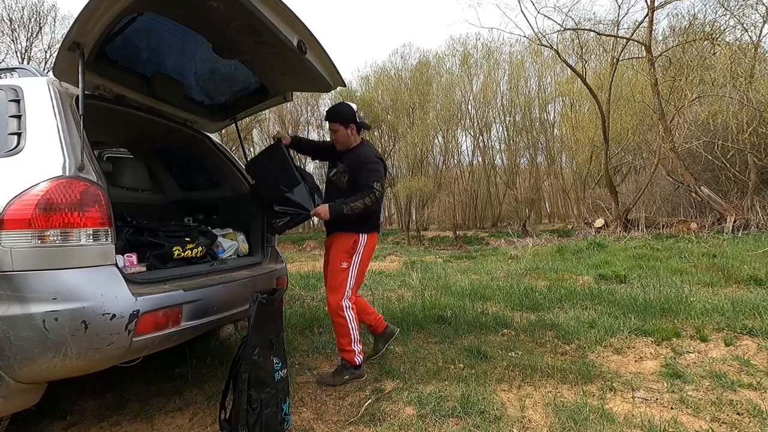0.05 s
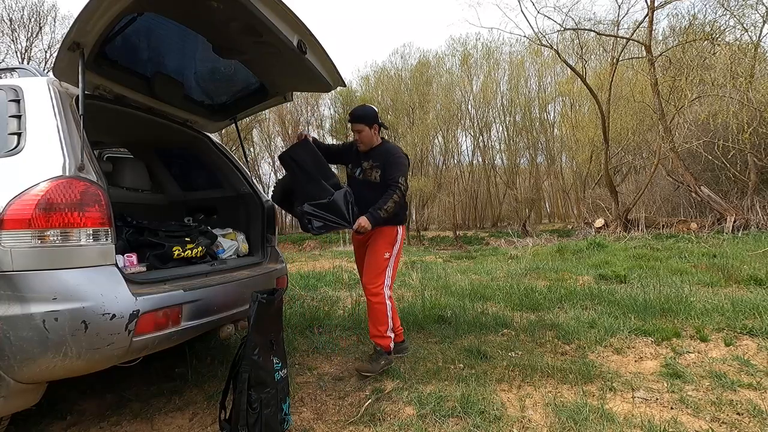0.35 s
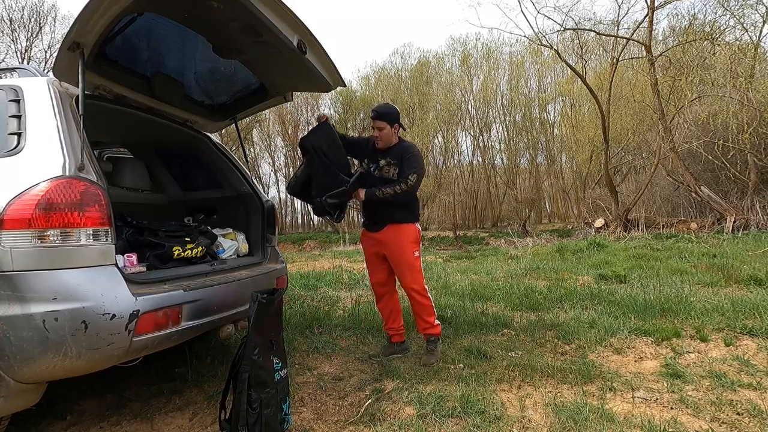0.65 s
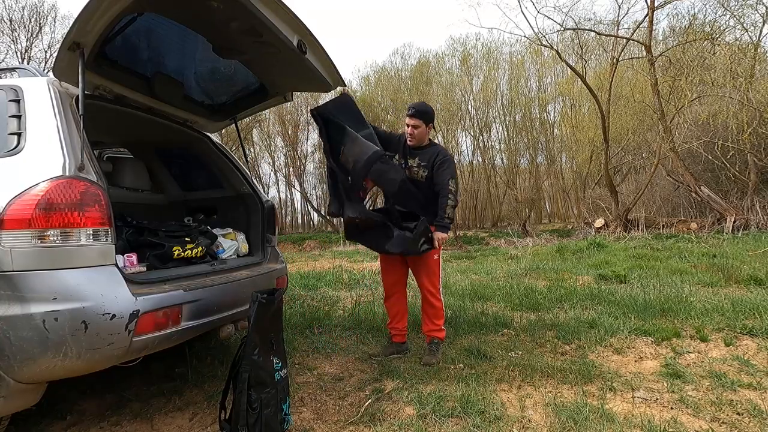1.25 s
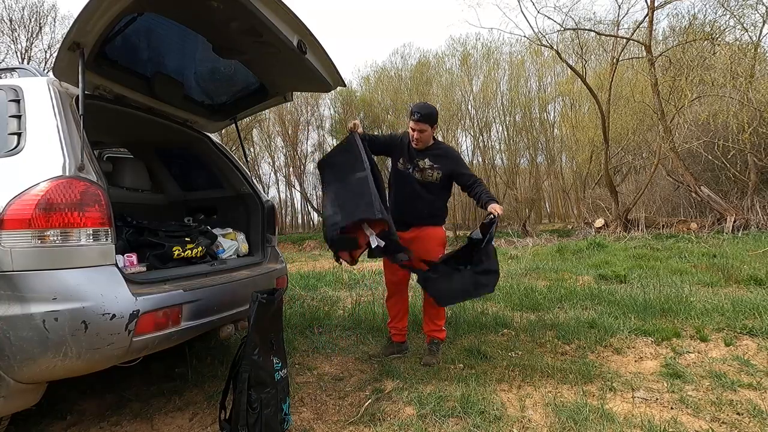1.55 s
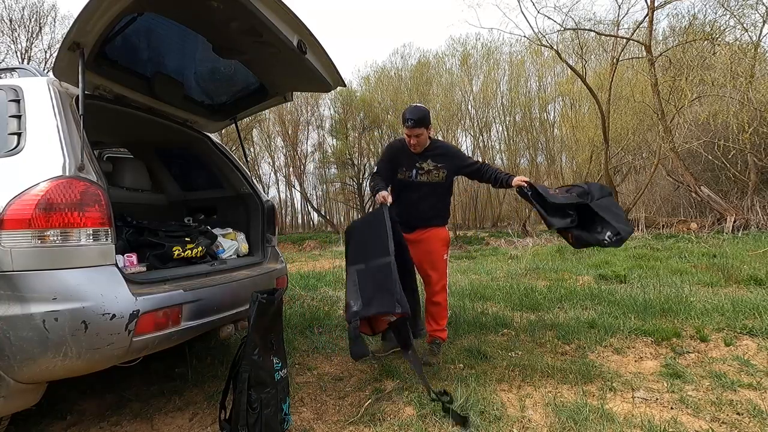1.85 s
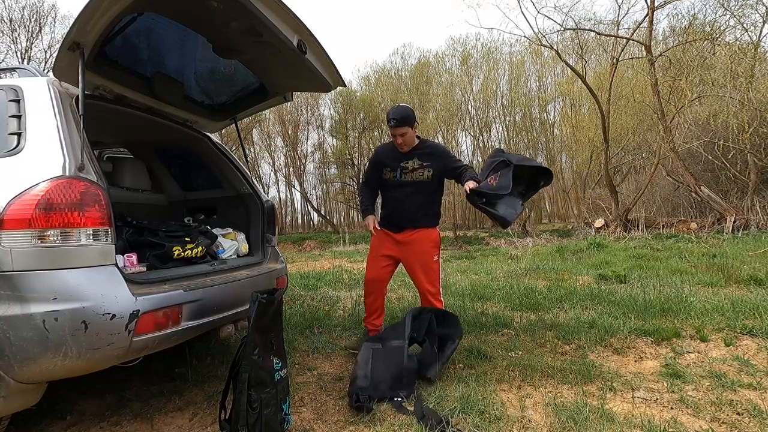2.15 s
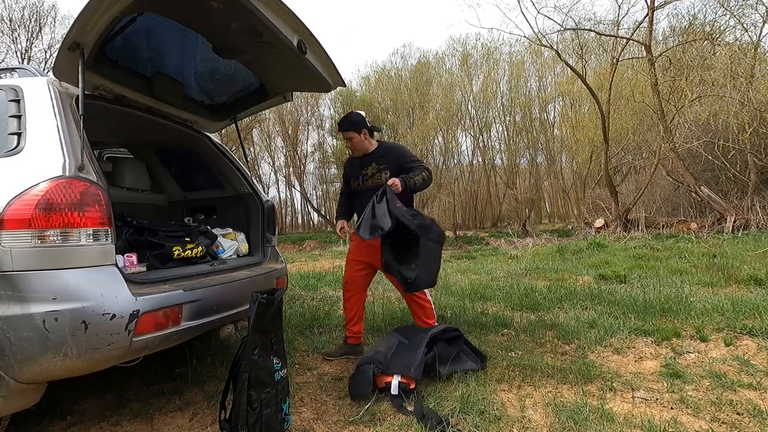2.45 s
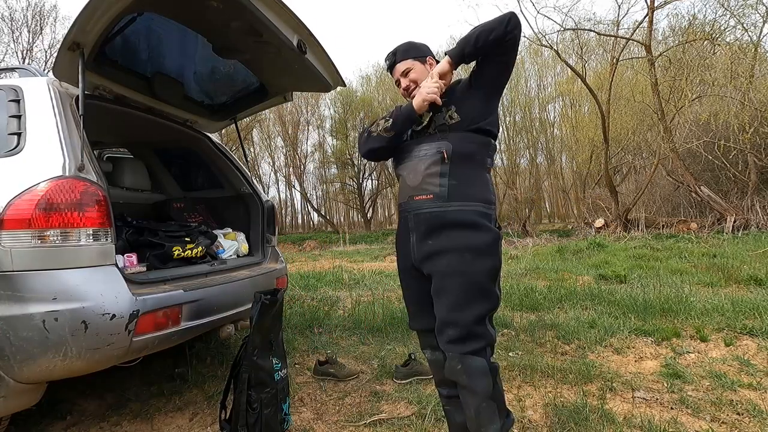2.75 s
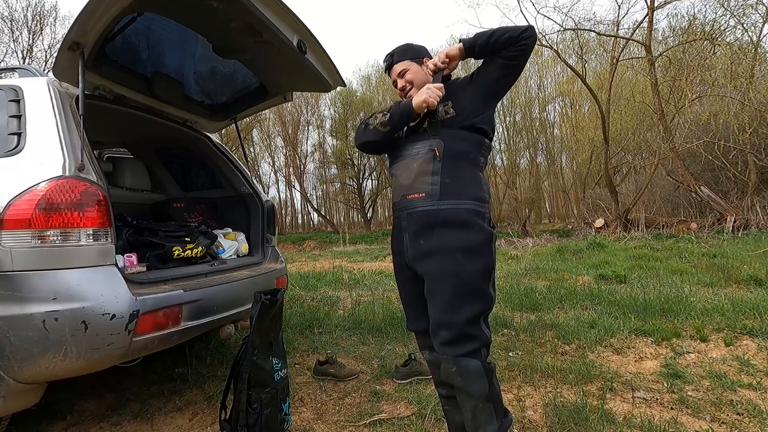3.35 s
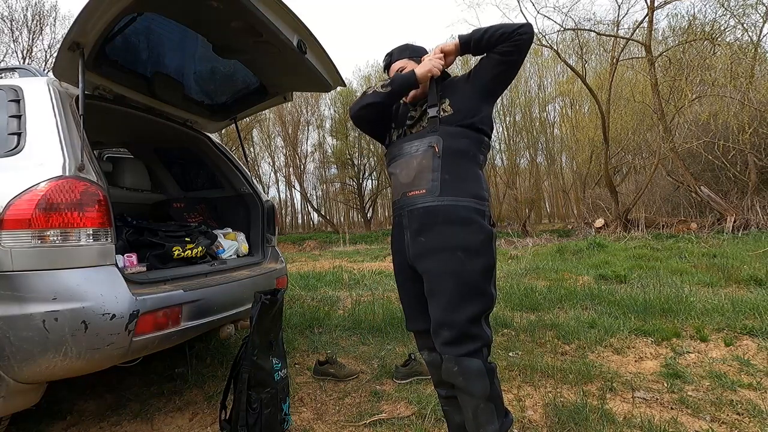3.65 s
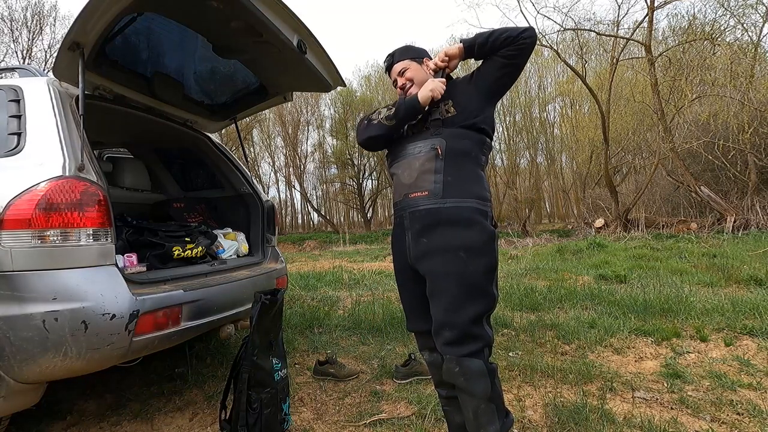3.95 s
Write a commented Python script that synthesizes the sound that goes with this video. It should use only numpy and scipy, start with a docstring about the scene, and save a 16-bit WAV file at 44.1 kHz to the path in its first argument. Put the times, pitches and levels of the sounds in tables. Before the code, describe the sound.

Fabric rustles and snaps as a diving suit is pulled from a bag, then lands on grass with a hollow thud. A click and a short fastener rasp follow, while woodland birds twitter and wind rumbles on the microphone.

```python
"""A diving suit is pulled out of a fabric bag, shaken loose and dropped on the grass by a parked car.
Its sliding cloth hisses and crackles, its folds snap tight, and it lands with a hollow thud.
After a sharp click the handling is quieter, and a fastener on the suit rasps open hook by hook.
Small birds whistle and twitter in the trees, and gusts of wind rumble on the microphone."""
import sys
import numpy as np
from scipy import signal
from scipy.fft import rfft, irfft, next_fast_len
from scipy.io import wavfile
from scipy.ndimage import uniform_filter1d, map_coordinates

SR = 44100
rng = np.random.default_rng(int(sys.argv[2]) if len(sys.argv) > 2 else 0)


def generate_wav(sig):
    """Save sig (samples, or channels by samples) to the path in sys.argv[1] as 16-bit PCM at SR."""
    pcm = np.round(np.clip(np.atleast_2d(sig).T, -1, 1) * 32767).astype(np.int16)
    wavfile.write(sys.argv[1], SR, pcm)


N = 176400
T = np.arange(N) / SR

# Tone colours of the quiet woods, the wind's low rumble and its gusts: f/Hz, gain/dB
HUSH_COLOUR = [(250, -1), (650, -16), (1400, -14.5), (2200, -18), (7300, -24), (8800, -35), (15000, -48)]
RUMBLE_COLOUR = [(10, -10.5), (30, 2.5), (60, -0.5), (120, -13.5), (300, -42.5), (2000, -100)]
GUST_COLOUR = [(30, -30), (75, 6), (140, -1.5), (200, -10), (400, -27.5), (2000, -85)]
# Strength of the wind: t/s, level/dB
WIND_LEVELS = [(0, -41.5), (.14, -34), (.44, -35), (.51, -53), (.68, -39), (.88, -56.5), (1.12, -36),
               (1.25, -46), (1.52, -32.5), (1.74, -30), (1.79, -38), (2.02, -48.5), (2.38, -41),
               (2.48, -57), (2.62, -45.5), (2.66, -32.5), (2.78, -37), (2.82, -24), (2.96, -27), (3.0, -22),
               (3.12, -23), (3.21, -33), (3.45, -37), (3.51, -31), (3.66, -39.5), (3.82, -24.5),
               (3.9, -20.5), (3.96, -38)]

# Bird whistles: t/s, length/s, start f/Hz, middle f/Hz, end f/Hz, relative level/dB
BIRD_WHISTLES = [(0.216, 0.085, 5760, 4800, 4550, -54.5), (0.779, 0.2, 7060, 6480, 6250, -57.5),
                 (1.029, 0.2, 7000, 6260, 5670, -55), (1.873, .055, 3970, 3850, 3700, -62),
                 (2.025, 0.073, 6640, 6350, 6340, -56.5), (2.24, 0.2, 7030, 6120, 5850, -61)]
# Twitters farther off: t/s, length/s, start f/Hz, end f/Hz, relative level/dB
BIRD_TWITTERS = [(0.069, 0.094, 5700, 3280, -52.5), (0.192, 0.077, 4900, 2860, -58),
                 (0.592, 0.07, 5960, 3750, -57.5), (0.879, .13, 3800, 4160, -53.5)]
# Runs of short chirps: t/s, number of chirps, relative level/dB
CHIRP_RUNS = [(2.274, 3, -54.5), (3.45, 4, -62.5)]
# Starts of a two-note song: t/s
SONG_STARTS = [2.584, 2.82, 3.073, 3.329, 3.602]
CHIRP_S, CHIRP_LOW_HZ, CHIRP_HIGH_HZ = .05, 3950, 5150
BIRD_WAVER, BIRD_BLUR_HZ = .0082, 380  # waver is a fraction of the pitch

# The click's low tail and sharp edge: level/dB, time to fade by 60 dB/s, f/Hz
CLICK_PARTS = [(-23.5, .06, 70), (-39, .0006, 0)]
# The fastener peeling open: t/s, level/dB
PEEL_LEVELS = [(3.215, -63), (3.285, -48), (3.32, -43.5), (3.355, -42.5), (3.385, -49), (3.425, -63)]
# Tone colour of its hooks: f/Hz, gain/dB
HOOK_COLOUR = [(500, -12), (1200, -13), (2600, 1), (5800, 0), (6600, -15), (12000, -26.5), (16000, -59)]
# Pitches at which its stiff flap rings: f/Hz, width/Hz, gain/dB
FLAP_RINGS = [(1100, 350, -2), (1660, 330, 0)]

# The squeak's first three harmonics: gain/dB
SQUEAK_HARMONICS = [-1, -10.5, -13]
# A footstep, then the suit landing in a heap: t/s, level/dB, hold/s
GROUND_HITS = [(.2, -42, 0.011), (2.086, -17.5, 0.02), (2.159, -26.5, 0.0027)]
# Tone colour of a thump on the ground: f/Hz, gain/dB
THUMP_COLOUR = [(30, -22), (150, 4.5), (270, -4), (500, -17.5), (3000, -64)]
# Folds snapping tight: t/s, level/dB, time to fade by 60 dB/s, centre f/Hz
FOLD_SNAPS = [(.092, -34, 0.034, 1490), (1.232, -37.5, 0.057, 3500), (1.302, -38, 0.025, 700),
              (1.337, -33, .04, 4500), (1.348, -23, 0.078, 678), (1.352, -23.5, 0.085, 1100),
              (1.529, -34.5, 0.043, 1800), (1.588, -28.5, 0.039, 1030), (1.715, -31.5, 0.08, 1670),
              (1.771, -30.5, 0.031, 1020), (1.827, -37, 0.06, 3000), (2.043, -38, 0.058, 2290),
              (2.108, -30.5, .04, 1390), (2.161, -29, 0.041, 1000), (2.188, -23.5, 0.029, 1460),
              (2.237, -34.5, 0.064, 1210), (2.514, -38, 0.033, 1300), (2.697, -47.5, 0.053, 3720)]
# Softening of the snaps' highest treble: f/Hz, gain/dB
SNAP_COLOUR = [(11500, -2), (16000, -26)]
# Fabric rubbing on fabric: t/s, body level/dB, treble level/dB
RUB_LEVELS = [(0, -50, -48.5), (.13, -40, -47), (.19, -54, -55), (.3, -67.5, -66.5), (.43, -47.5, -52),
              (.55, -57, -57), (.68, -51, -55.5), (.92, -50.5, -50.5), (1.35, -44, -48.5),
              (1.44, -50.5, -51.5), (1.55, -46.5, -51.5), (1.66, -59.5, -63.5), (1.75, -53.5, -54),
              (1.88, -59.5, -60), (2.075, -54.5, -53), (2.1, -36, -43), (2.16, -40, -44.5),
              (2.22, -50, -53.5), (2.41, -56, -59.5), (2.52, -53.5, -53.5), (2.63, -53.5, -58),
              (2.66, -70, -73)]
# The suit dragging inside the bag, and sleeves brushing the suit: t/s, length/s, level/dB
BAG_DRAGS = [(.33, 0.21, -50.5), (.72, 0.44, -49.5), (1.22, 0.23, -40)]
SLEEVE_BRUSHES = [(3.48, 0.063, -58), (3.56, 0.21, -61), (3.94, 0.16, -47.5)]
# Tone colours of the rubbing's body and treble, the drags and the brushes: f/Hz, gain/dB
BODY_COLOUR = [(60, -22.5), (300, 1.5), (1200, -1), (2800, -8.5), (4000, -19.5), (16000, -86)]
SWISH_COLOUR = [(1000, -9), (3300, -0.5), (7300, -6.5), (8500, -15), (12000, -23.5), (16000, -40.5)]
DRAG_COLOUR = [(100, -17.5), (330, 6), (450, 5), (750, -36), (1050, -7), (2000, -15), (6000, -63)]
BRUSH_COLOUR = [(600, -11.5), (1650, -7), (2200, -10), (6500, -13), (16000, -43)]


def amp(db):
    """Turn decibels into a number to multiply by."""
    return 10 ** (np.asarray(db) / 20)


def fade(t, fade_s):
    """Die away by 60 dB every fade_s seconds."""
    return amp(-60 * t / fade_s)


def unit(x):
    """Scale x to an average strength (rms) of 1."""
    return x / np.sqrt(np.mean(x ** 2) + 1e-20)


def curves(rows):
    """Join timed points with straight lines, one curve per column after the time."""
    times, *columns = np.transpose(rows)
    return [np.interp(T, times, column) for column in columns]


def wobble(per_s):
    """A smooth curve through per_s random points a second."""
    return map_coordinates(rng.standard_normal(int(N * per_s / SR) + 4), [T * per_s])


def stroke(start, length, db):
    """One smooth swell and fall."""
    return amp(db) * np.sin(np.pi * np.clip((T - start) / length, 0, 1))


def filtered(x, response):
    """Multiply each frequency in x by response(frequency)."""
    n = x.shape[-1]
    padded = next_fast_len(n + 8192)
    return irfft(rfft(x, padded) * response(np.fft.rfftfreq(padded, 1 / SR)), padded)[..., :n]


def resonance(f, hz, width_hz):
    """How something that rings at hz responds to frequency f."""
    return 1j * f * width_hz / (hz * hz - f * f + 1j * f * width_hz)


def colour(x, points):
    """Shape the bass and treble of x with a tone colour table."""
    f, db = np.transpose(points)
    return filtered(x, lambda hz: amp(np.interp(np.log(hz + 1), np.log(f), db)))


def spread(pair, side_db):
    """Make left and right from a middle and a side signal; more side sounds wider."""
    side = amp(side_db) * pair[1]
    return np.array([pair[0] + side, pair[0] - side])


def noise(points, side_db):
    """Stereo noise with a tone colour, at strength 1."""
    return unit(spread(colour(rng.standard_normal((2, N)), points), side_db))


def add(out, start, x):
    """Mix x into out, beginning at start seconds."""
    part = out[..., max(round(start * SR), 0):][..., :x.shape[-1]]
    part += x[..., :part.shape[-1]]


def crackle(times, sizes, fade_s):
    """Two channels of tiny fading noise bursts, at strength 1."""
    hits = np.bincount((times * SR).astype(int), sizes ** 2, N)[:N]
    power = signal.lfilter([1], [1, -fade(1 / SR, fade_s) ** 2], hits)
    return unit(np.sqrt(power) * rng.standard_normal((2, N)))


def glide(length, start_hz, middle_hz, end_hz, waver=BIRD_WAVER):
    """The phase and fluttering swell of a note that slides through three pitches."""
    progress = np.linspace(0, 1, int(length * SR))
    hz = np.polyval(np.polyfit([0, .5, 1], [start_hz, middle_hz, end_hz], 2), progress)
    drift, flutter = [map_coordinates(points, [progress * length * 120], mode="mirror")
                      for points in rng.standard_normal((2, 64))]
    phase = 2 * np.pi * np.cumsum(hz * (1 + waver * drift)) / SR
    swell = np.sqrt(2 * np.abs(np.sin(np.pi * progress))) * amp(3 * flutter)
    return phase, swell


def blurred(phase, width_hz):
    """Smear a note into a narrow band of noise, at strength 1."""
    a, b = filtered(rng.standard_normal((2, len(phase))), lambda f: np.exp(-(f / width_hz) ** 2))
    return unit(a * np.sin(phase) + b * np.cos(phase))


def hush():
    """The faint, steady hiss of the woods."""
    return amp(-58) * noise(HUSH_COLOUR, side_db=-6)


def far_birds(per_s=20, low_hz=3900, high_hz=5300, level_db=-71):
    """Distant birds chirp at random from left and right, blurred by the woods."""
    out = np.zeros((2, N))
    for when, pitch, slope, side in rng.uniform(size=(int(per_s * N / SR), 4)):
        hz = low_hz + pitch * (high_hz - low_hz)
        slide_hz = (slope - .5) * (CHIRP_HIGH_HZ - CHIRP_LOW_HZ) / 2
        phase, swell = glide(CHIRP_S, hz - slide_hz, hz, hz + slide_hz)
        chirp = amp(level_db) * swell * blurred(phase, BIRD_BLUR_HZ)
        add(out, when * N / SR, np.sqrt([[side], [1 - side]]) * chirp)
    return out


def chirp_rows(gap_s=.131, vary=.04):
    """More rows like BIRD_TWITTERS: each chirp dips softly, then rises, never twice the same."""
    rows, shape = [], np.array([CHIRP_S, CHIRP_LOW_HZ, CHIRP_HIGH_HZ])
    for first, count, db in CHIRP_RUNS:
        for start in first + gap_s * np.arange(count):
            length, low, high = shape * (1 + vary * rng.standard_normal(3))
            rows.append((start - length, length, high + (high - low) / 2, (low + high) / 2, db - 4))
            rows.append((start, length, low, high, db + rng.normal()))
    return rows


def birds(blur_share=.45, note_gap_s=.11, echo_s=.21):
    """Whistles, a two-note song and twitters echo among the trees."""
    calls = np.zeros(N)
    rising_whistles = [(.99 + k * .208, .07, 6150, 6350, 6750, -59.5) for k in range(5)]
    for start, length, *pitches, db in BIRD_WHISTLES + rising_whistles:
        phase, swell = glide(length, *pitches)
        pure = np.sqrt(1 - blur_share) * np.sin(phase)
        breathy = np.sqrt(blur_share / 2) * blurred(phase, BIRD_BLUR_HZ / 2)
        add(calls, start, amp(db) * swell * (pure + breathy))
    falling_note, flat_note = (.075, 3550, 3150, 2880, -66.5), (.085, 2700, 2610, 2600, -63.5)
    for start in SONG_STARTS:
        for k, (length, *pitches, db) in enumerate([falling_note, flat_note]):
            phase, swell = glide(length, *pitches, waver=BIRD_WAVER / 2)
            add(calls, start + k * note_gap_s, amp(db + rng.normal()) * swell * np.sin(phase))
    for start, length, start_hz, end_hz, db in BIRD_TWITTERS + chirp_rows():
        phase, swell = glide(length, start_hz, (start_hz + end_hz) / 2, end_hz)
        add(calls, start, amp(db) * swell * blurred(phase, BIRD_BLUR_HZ) / np.sqrt(2))
    t = np.arange(SR // 2) / SR
    tail = rng.standard_normal((2, len(t))) * fade(t, echo_s)
    echo = signal.fftconvolve(calls[None], tail / np.linalg.norm(tail[0]), axes=1)[:, :N]
    return amp(-.5) * calls + amp(-1.5) * echo


def eddies(points):
    """Swirling air: low noise whose strength is held near 1."""
    swirl = noise(points, side_db=-6.5)
    power = uniform_filter1d(np.mean(swirl ** 2, axis=0), size=2600)
    return swirl / np.sqrt(np.abs(power) + 1e-6)


def wind(lean_right_db=1.37, gust_growth=2.06):
    """Wind beats on the microphone; strong gusts reach higher in pitch."""
    level_db, = curves(WIND_LEVELS)
    rumble = amp(level_db) * eddies(RUMBLE_COLOUR)
    gusts = amp(-29.5 + gust_growth * (level_db + 23.5)) * eddies(GUST_COLOUR)
    return (rumble + gusts) * amp([[-lean_right_db], [lean_right_db]])


def click(start=2.641):
    """One sharp click with a low tail."""
    t = np.maximum(T - start, 0)
    parts = [amp(db) * fade(t, fade_s) * np.cos(2 * np.pi * hz * t) for db, fade_s, hz in CLICK_PARTS]
    return (T > start) * sum(parts)


def fastener(hooks_per_s=205):
    """Hooks let go one after another, each a tick with a rough tail; at first they ring the flap."""
    start, end = PEEL_LEVELS[0][0], PEEL_LEVELS[-1][0]
    count = int(hooks_per_s * (end - start))
    time_scatter, size_scatter = rng.standard_normal((count, 2)).T
    times = start + (np.arange(count) + .22 * time_scatter) / hooks_per_s
    sizes = amp(1.7 * size_scatter)
    hooks = crackle(times, sizes, fade_s=.015)
    hooks[0] += unit(np.bincount((times * SR).astype(int), sizes, N))  # the sharp ticks
    hooks = spread(hooks, side_db=-4.5)
    rasp = unit(colour(hooks, HOOK_COLOUR)) * amp(curves(PEEL_LEVELS)[0])
    ringing = filtered(hooks, lambda f: sum((-1) ** k * amp(db) * resonance(f, hz, width)
                                            for k, (hz, width, db) in enumerate(FLAP_RINGS)))
    flap = unit(ringing) * stroke(start=3.235, length=.11, db=-48.5)
    time_share = count / hooks_per_s * SR / N  # unit() also averages over the silence
    return (rasp + flap) * np.sqrt(time_share)


def squeak(start=1.603, length=.028, start_hz=1307, end_hz=1037, level_db=-34):
    """Rubber slips out of the bag with a brief falling squeak."""
    out = np.zeros(N)
    phase, _ = glide(length, start_hz, (start_hz + end_hz) / 2, end_hz, waver=.04)
    note = sum(amp(level_db + db) * np.sin(k * phase) for k, db in enumerate(SQUEAK_HARMONICS, 1))
    add(out, start, np.hanning(len(phase)) * note)
    return out


def thuds(boom_hz=202, sag_per_s=.3, rise_s=.0051):
    """A weight hits the ground: a hollow boom of trapped air over a dull thump."""
    out, t = np.zeros((2, N)), np.arange(SR // 3) / SR
    rise = np.minimum(t / rise_s, 1)
    phase = 2 * np.pi * np.cumsum(boom_hz * (1 - sag_per_s * t)) / SR
    for start, db, hold in GROUND_HITS:
        boom = np.sqrt(2) * np.sin(phase) * fade(np.maximum(t - hold, 0), fade_s=.07)
        thump = amp(-2.5) * noise(THUMP_COLOUR, side_db=-23.5)[:, :len(t)] * fade(t, fade_s=.31)
        add(out, start, amp(db) * rise * (boom + thump))
    return out


def snaps(rise_s=.0005):
    """Each fold pulls tight with a short burst of noise around one broad pitch."""
    out, t = np.zeros((2, N)), np.arange(SR // 8) / SR
    rise = 1 - np.exp(-t / rise_s)
    for start, db, fade_s, hz in FOLD_SNAPS:
        dull_hz = .67 * hz  # the treble falls away above this
        burst = filtered(rng.standard_normal((2, len(t))),
                         lambda f: resonance(f, hz, width_hz=hz / 1.1) / (1 + 1j * f / dull_hz))
        add(out, start, amp(db) * rise * fade(t, fade_s) * unit(spread(burst, side_db=-14.5)))
    return colour(out, SNAP_COLOUR)


def friction(points, side_db, creases_per_s=450, crease_share=.28):
    """Sliding cloth: a smooth hiss plus the crackle of small creases."""
    count = int(creases_per_s * N / SR)
    sizes = amp(2.5 * np.minimum(rng.exponential(size=count), 4))
    creases = np.sqrt(crease_share) * crackle(rng.uniform(0, N / SR, count), sizes, fade_s=.0059)
    hiss = np.sqrt(1 - crease_share) * rng.standard_normal((2, N))
    return unit(spread(colour(creases + hiss, points), side_db))


def suit_rustle(narrow_db=-24, wide_db=-9):
    """The suit rubs and drags unevenly in the bag; later its sleeves brush against it."""
    body_db, treble_db = curves(RUB_LEVELS)
    drag_level = sum(stroke(*row) for row in BAG_DRAGS)
    brush_level = sum(stroke(*row) for row in SLEEVE_BRUSHES)
    body = amp(body_db) * friction(BODY_COLOUR, narrow_db) * amp(1.02 * wobble(per_s=60))
    drag = drag_level * friction(DRAG_COLOUR, narrow_db) * amp(2.7 * wobble(per_s=44.88))
    swish = amp(treble_db) * friction(SWISH_COLOUR, wide_db)
    brush = brush_level * friction(BRUSH_COLOUR, wide_db)
    return (body + swish + drag + brush) * amp(1.5 * wobble(per_s=70))


def scene():
    """The suit and the click, heard over birds, wind and the hush of the woods."""
    foreground = suit_rustle() + snaps() + thuds() + squeak() + click() + fastener()
    return foreground + birds() + far_birds() + wind() + hush()


def record(dry, top_hz=15700):
    """Cut away the very highest treble."""
    return filtered(dry, lambda hz: hz < top_hz)


dry = scene()
out = record(dry)
generate_wav(out)
```